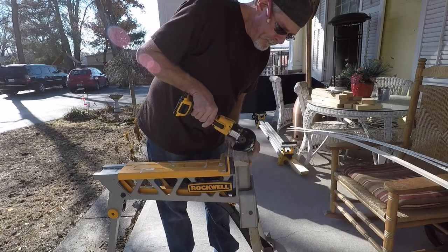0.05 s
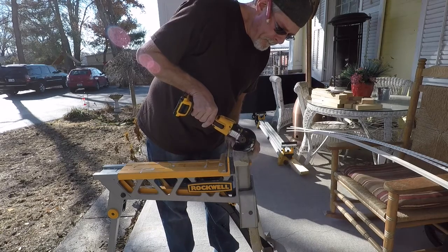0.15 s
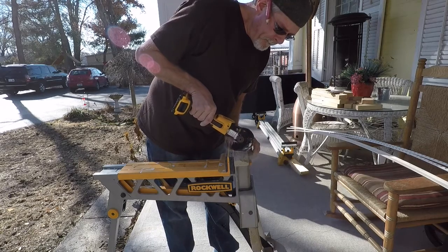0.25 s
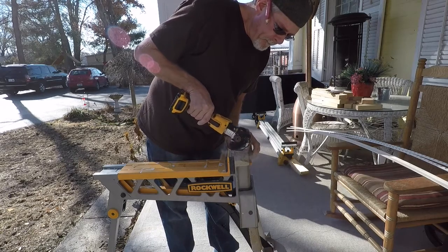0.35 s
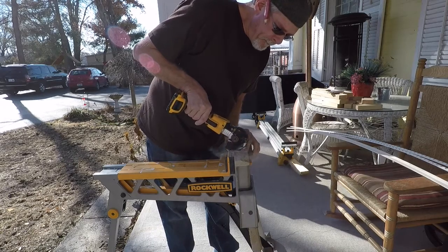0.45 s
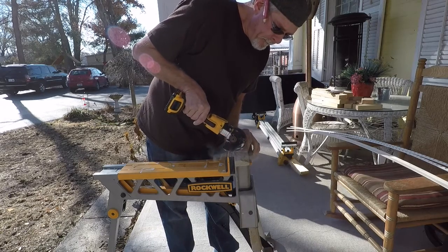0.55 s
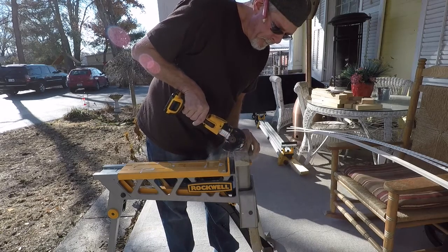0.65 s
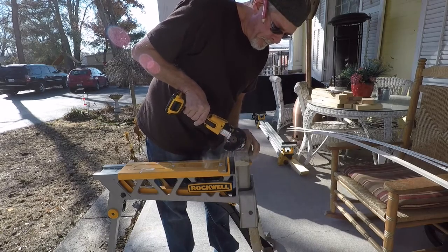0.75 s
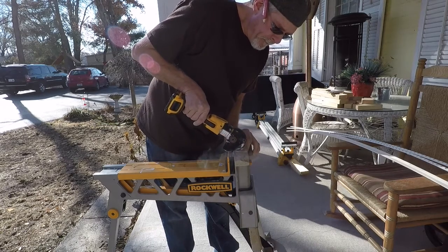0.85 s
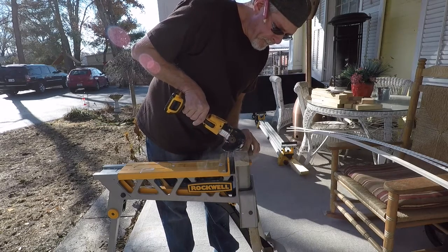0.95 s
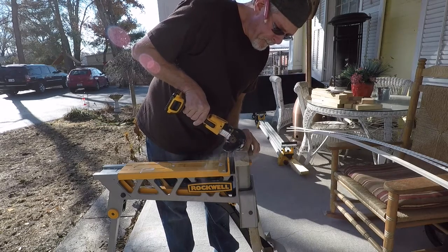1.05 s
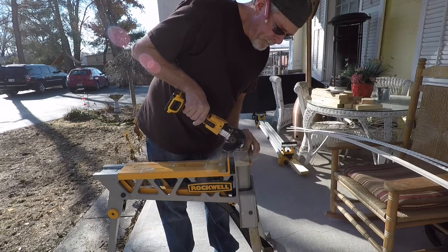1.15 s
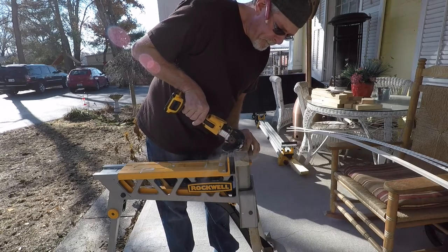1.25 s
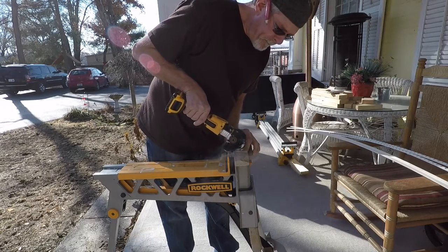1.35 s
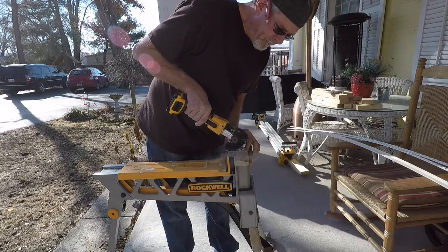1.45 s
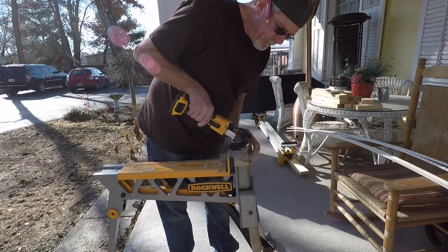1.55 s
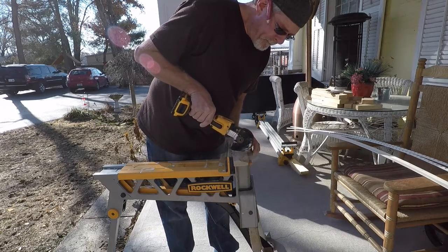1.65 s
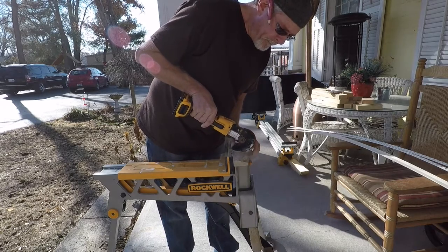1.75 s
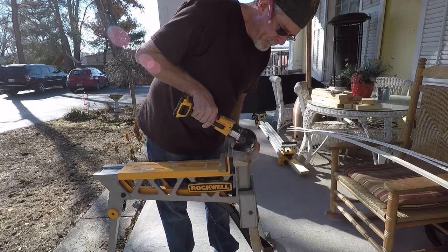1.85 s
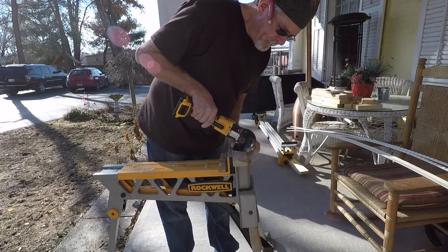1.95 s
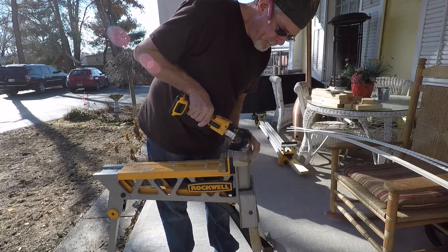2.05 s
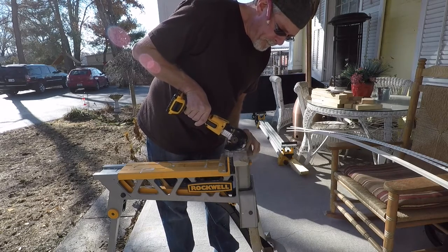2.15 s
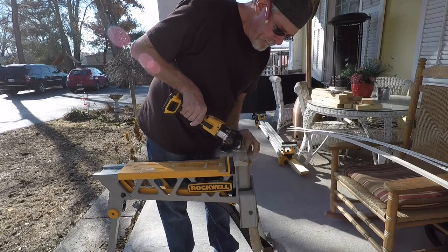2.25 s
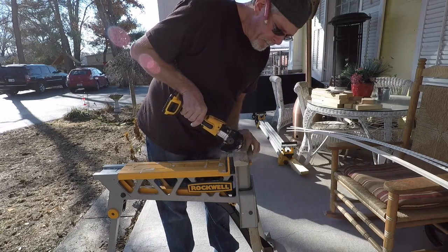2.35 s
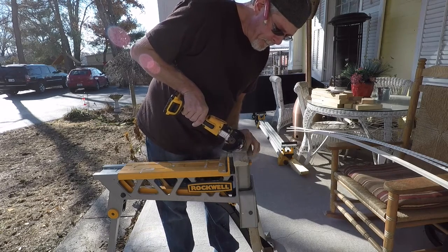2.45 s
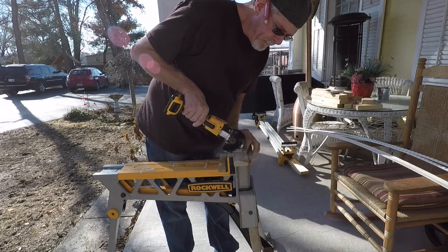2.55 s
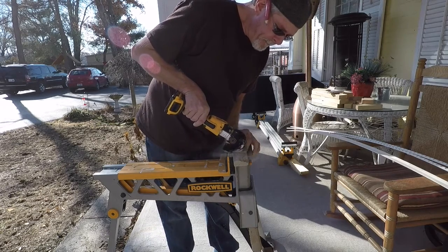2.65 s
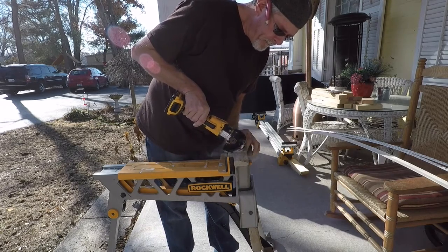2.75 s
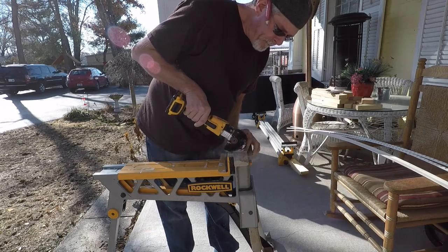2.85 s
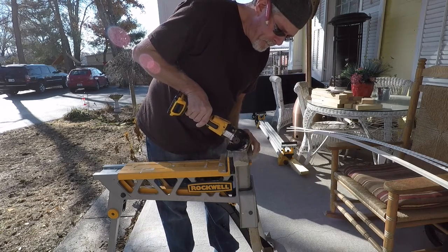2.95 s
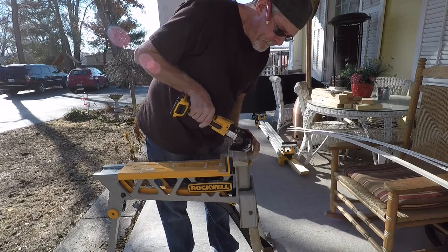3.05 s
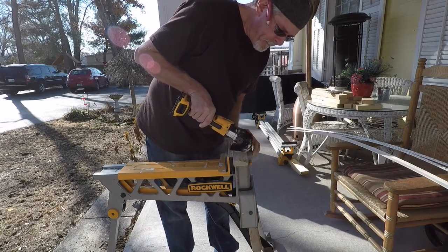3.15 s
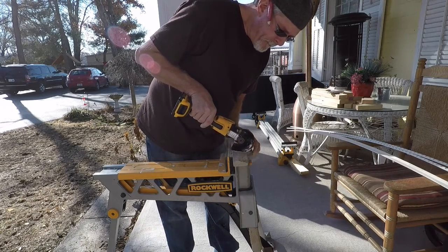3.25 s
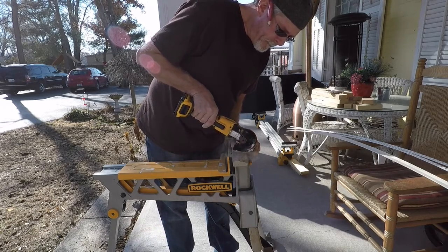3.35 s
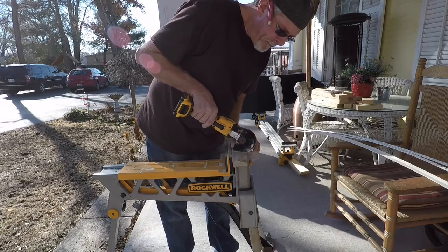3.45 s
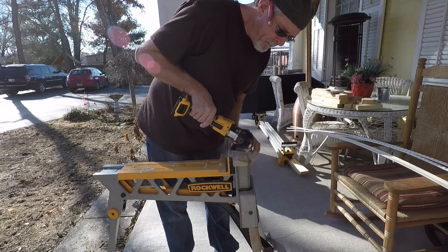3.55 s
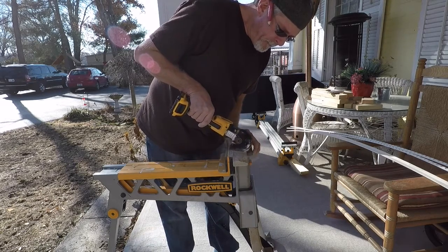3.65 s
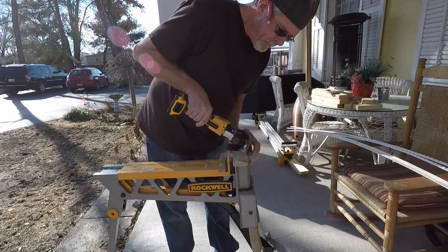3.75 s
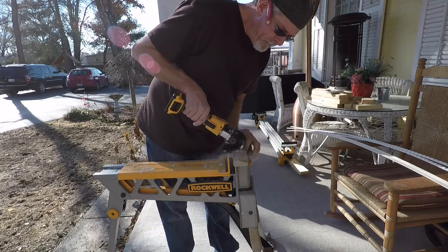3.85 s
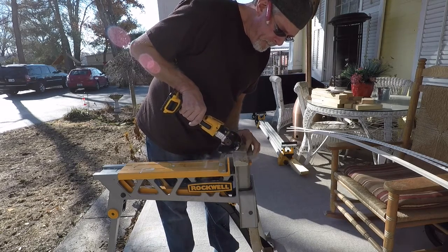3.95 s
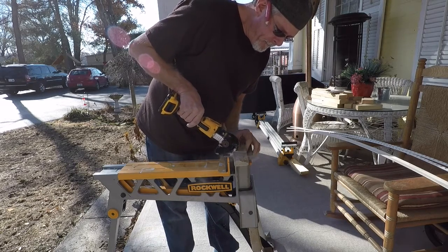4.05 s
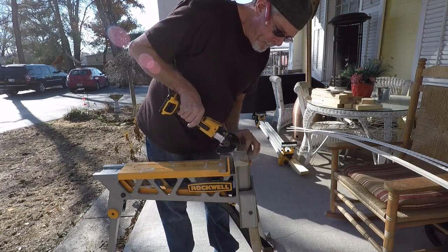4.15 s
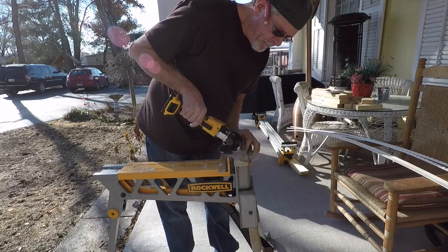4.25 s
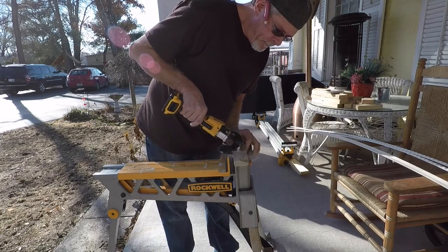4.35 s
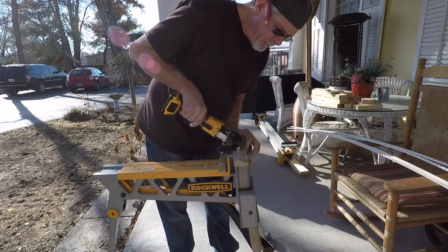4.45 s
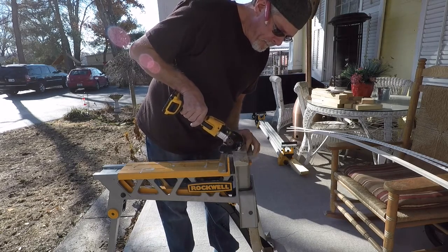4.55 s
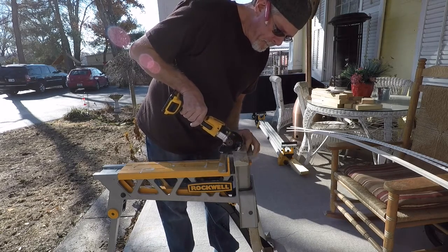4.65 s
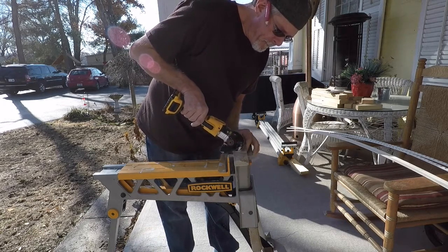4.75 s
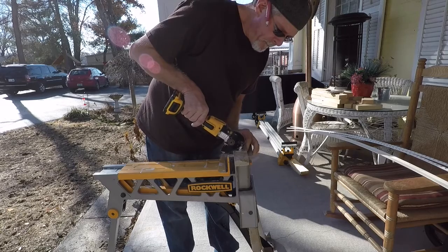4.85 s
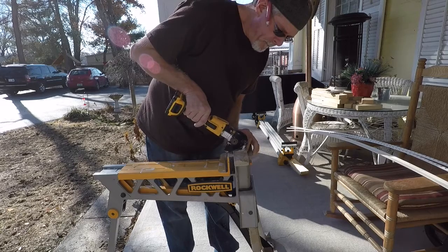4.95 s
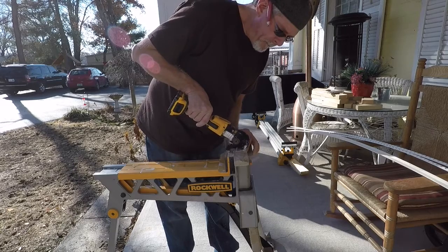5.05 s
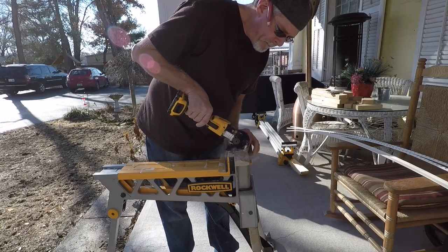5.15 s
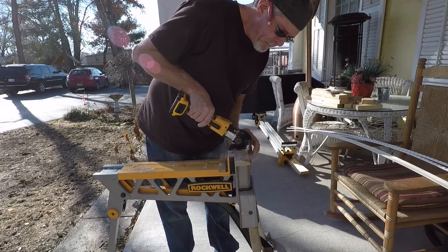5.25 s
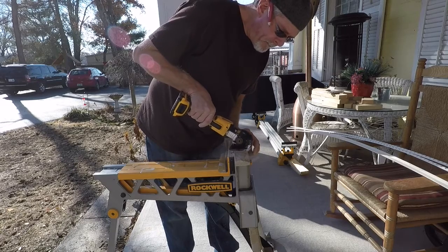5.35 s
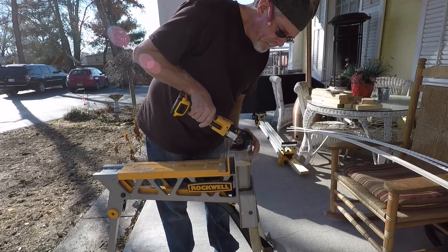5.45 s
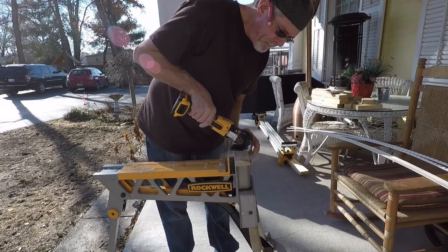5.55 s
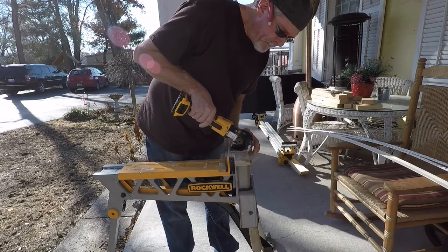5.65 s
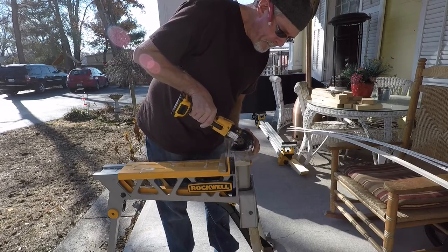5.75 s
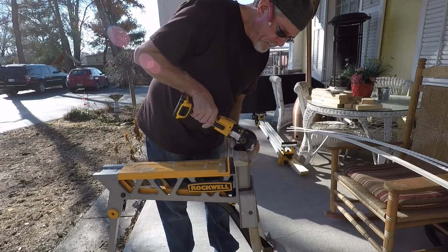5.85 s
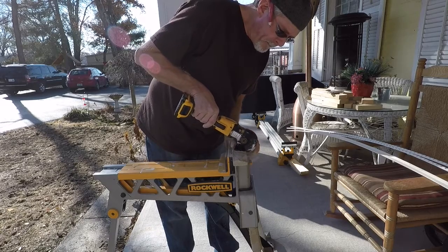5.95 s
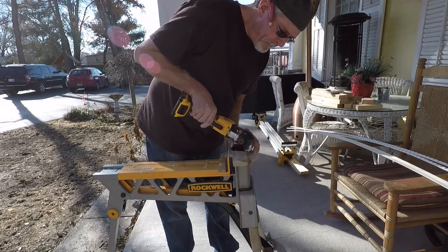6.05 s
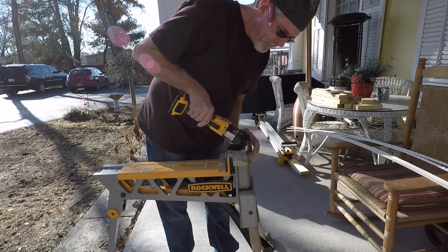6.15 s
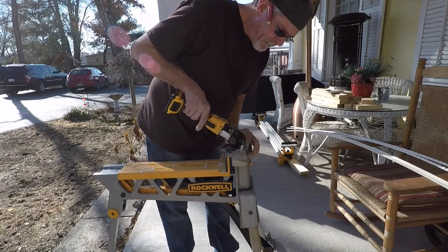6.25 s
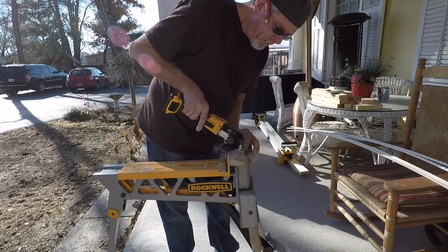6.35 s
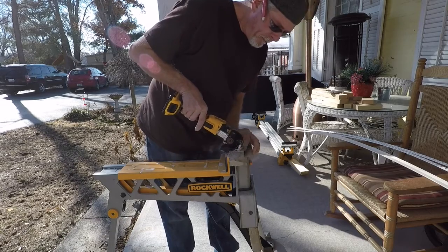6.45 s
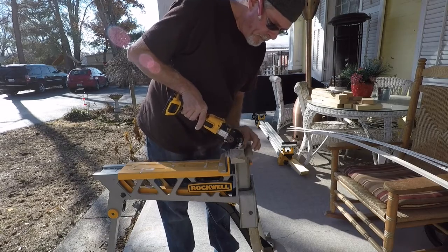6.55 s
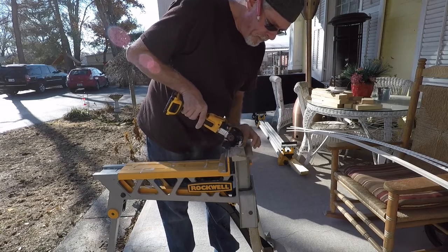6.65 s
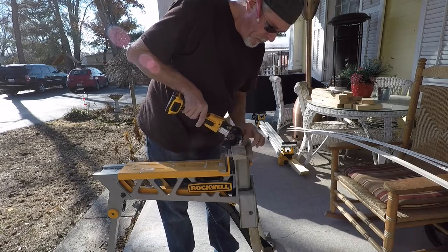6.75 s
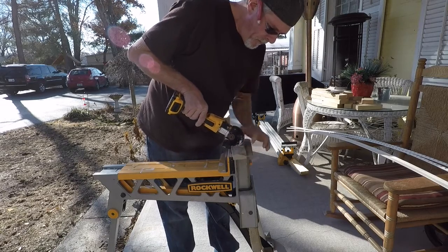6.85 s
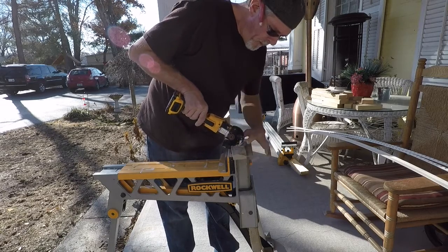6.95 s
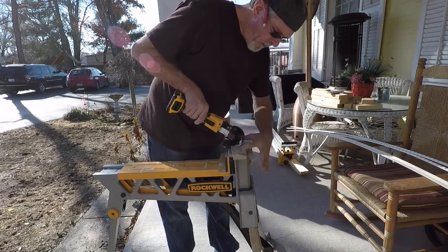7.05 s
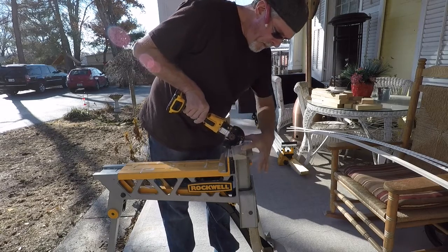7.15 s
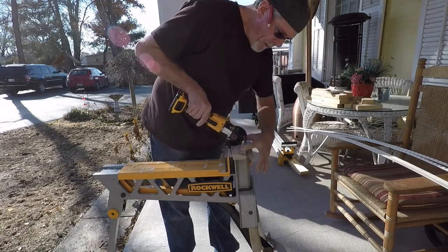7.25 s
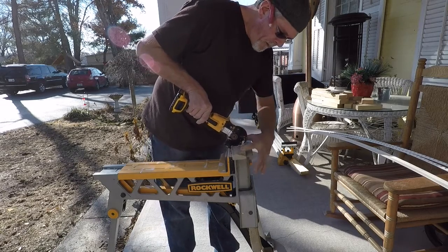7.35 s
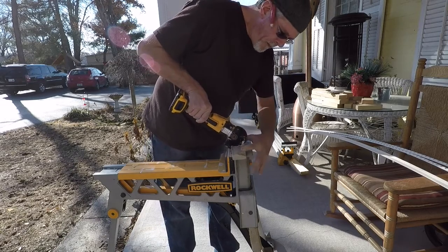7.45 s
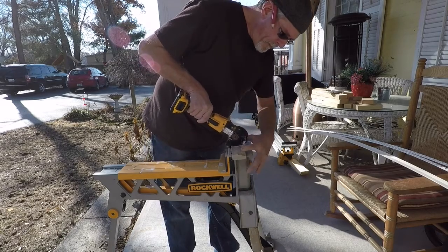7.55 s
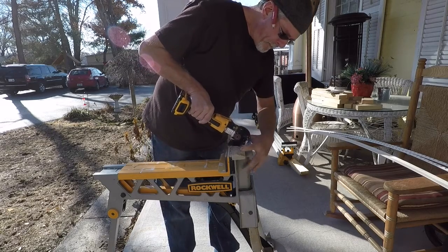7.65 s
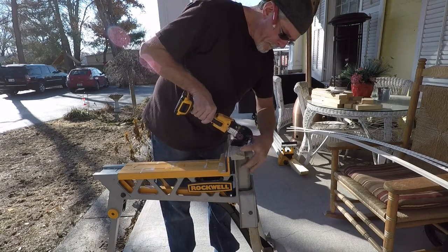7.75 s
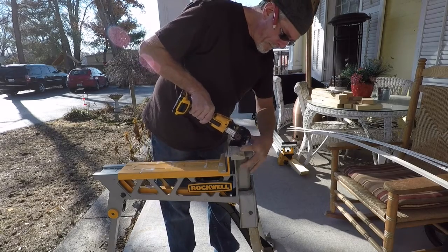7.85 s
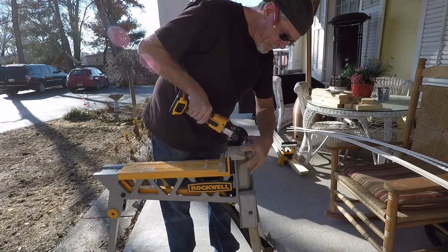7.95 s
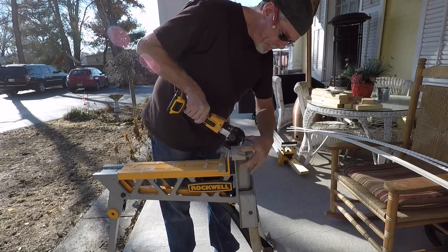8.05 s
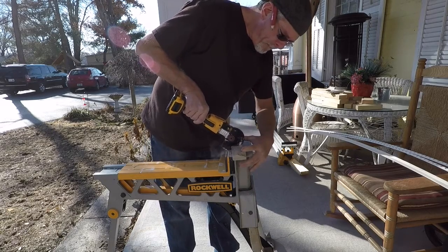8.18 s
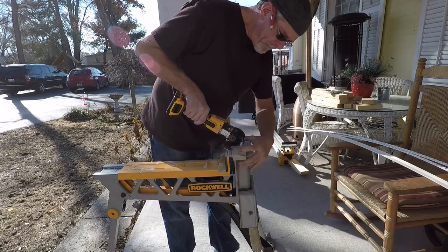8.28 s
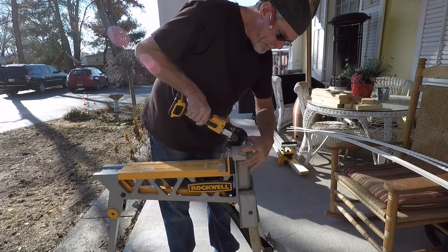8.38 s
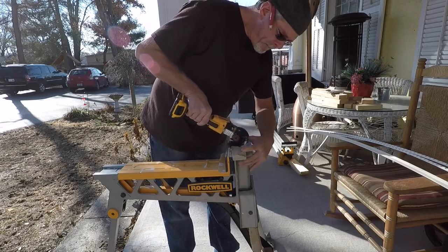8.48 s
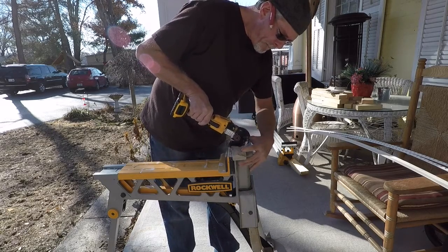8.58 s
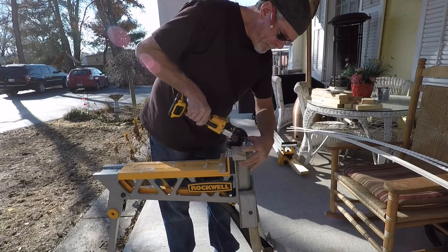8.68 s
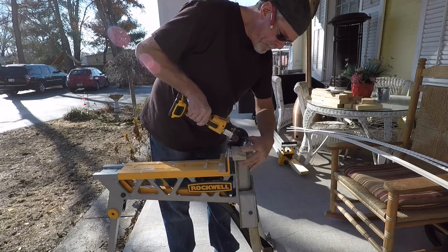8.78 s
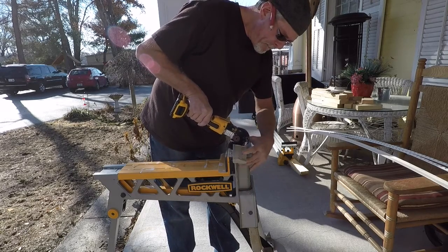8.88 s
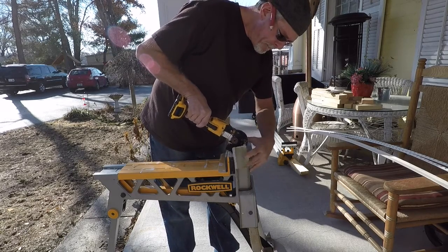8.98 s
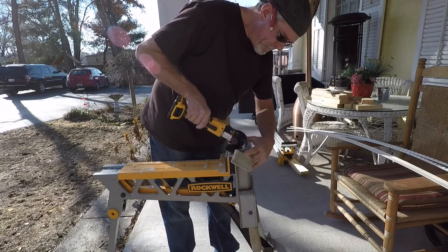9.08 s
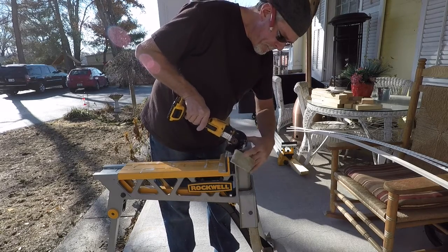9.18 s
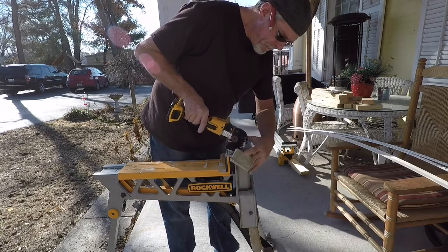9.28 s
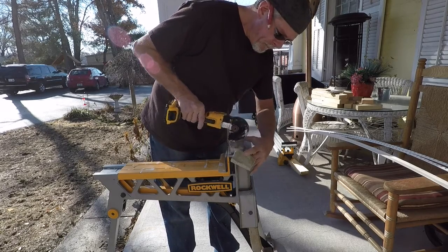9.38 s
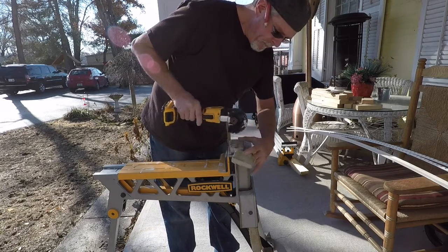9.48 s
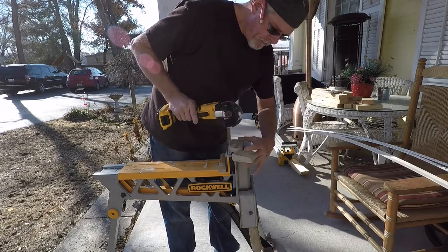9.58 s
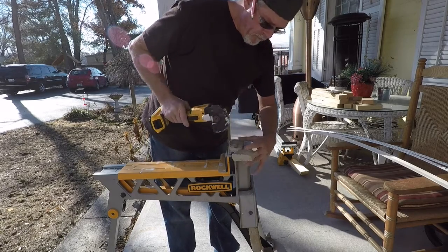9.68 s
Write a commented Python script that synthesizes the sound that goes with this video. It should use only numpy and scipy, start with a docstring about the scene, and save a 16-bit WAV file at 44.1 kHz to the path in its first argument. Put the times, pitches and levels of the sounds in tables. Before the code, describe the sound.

An oscillating power tool buzzes harshly through a clamped slab in one long cut, pauses, blips briefly, then cuts again and stops on a quiet porch.

```python
"""Porch: an oscillating tool grinds into a clamped slab: a long cut, a blip of the trigger, a shorter cut.
Blows in the kerf are a slowly changing pattern over six swings; grit is noise pulsed by the strokes.
Both are filtered by body and blade; sine tones follow multiples of the swing. Clacks, soft scuffs, bench
ring and a noise-tap porch tail follow; filtered noise makes light wind and street hum at one microphone."""
import sys
import numpy as np
from scipy import signal
from scipy.fft import rfft, irfft, next_fast_len
from scipy.io import wavfile
from scipy.ndimage import uniform_filter1d, map_coordinates

SR = 44100
rng = np.random.default_rng(int(sys.argv[2]) if len(sys.argv) > 2 else 0)


def dump_mix(stems):
    """Bounce the given channels to the path in sys.argv[1] as a 16-bit WAV at rate SR."""
    frames = np.atleast_2d(stems).T  # one column per channel
    limited = np.clip(frames, -1, 1)  # hard clip at full scale
    pcm = np.round(limited * 32767).astype(np.int16)
    wavfile.write(sys.argv[1], SR, pcm)


N = 428642


# spells when the blade is eased off the slab: (start [s], end [s])
EASED_SPELLS = [(3.83, 4.88), (5.94, 6.5), (8.86, 9.6)]
EASE_S = .08
# level against speed: (share of full speed, rattle held [dB], rattle coasting [dB], tones [dB])
LEVEL_BY_SPIN = [(.35, -40, -52, -60), (.45, -28, -36, -50), (.6, -7, -22, -38), (.75, -1, -5, -27),
                 (.9, 3, 1, -11), (.97, 0, 0, 0)]
# grit against rattle, before the slow-speed boost and trim: (time [s], level [dB])
GRIT_LEVEL = [(.3, -1), (.45, -5), (1.45, -4), (1.75, -2), (1.9, 4), (2.05, -5), (2.95, -4), (3.4, 3),
              (3.85, -4), (4, -12), (4.2, -8), (4.82, -8), (4.95, -1), (5.75, -1), (5.9, 2), (6, -8),
              (6.3, -8), (7.1, 2), (7.45, 0), (7.55, -6), (7.7, -8), (8.55, -6), (8.8, -7), (8.87, 3),
              (8.97, -7)]
SLOW_GRIT_DB, GRIT_MAX_DB = 60, 8  # grit gained per share of speed lost
RATTLE_DB, RATTLE_DB_PER_GRIT_DB = -11.5, .34  # a rougher cut is louder
TREBLE_DB, TREBLE_EASED_DB = -22.8, -21.5
SLOW_DULL_DB = -16  # treble lost per share of speed lost
CLATTER_DB, CLATTER_SLOPE = -50, 1.7


def tool():
    """Stroke-driven rattle and grit excite the body; multiples of the swing sound as tones."""
    t = np.arange(N) / SR
    share = spin(t)
    eased = sum(within(t, *spell, EASE_S) for spell in EASED_SPELLS)
    held = sum(within(t, on, off, .01) for on, off, _ in TRIGGER)
    grit_db = curve(GRIT_LEVEL, t)[0]
    grit_gain = gain_of(np.minimum(grit_db + SLOW_GRIT_DB * (1 - share), GRIT_MAX_DB))
    turns = swing(t, share, grit_gain)
    blow = gain_of(1.5 * rng.standard_normal(4000))[turns.astype(int)]  # each swing bites differently
    raw_grit = evened(rng.standard_normal(N) * strokes(turns) * blow)

    drive = rattle(turns) * blow ** .5 + gain_of(-1.) * grit_gain * fine_grit(raw_grit)
    drive /= np.sqrt(uniform_filter1d(drive ** 2, 3000))
    body = evened(colour(drive, blade_gain))
    treble = colour(body, band(6000, 20000))
    rest_gain = gain_of(RATTLE_DB + RATTLE_DB_PER_GRIT_DB * grit_db)
    treble_db = TREBLE_DB + (TREBLE_EASED_DB - TREBLE_DB) * eased + SLOW_DULL_DB * (1 - share)
    mix = rest_gain * (body - treble) + gain_of(treble_db) * evened(treble)
    mix += gain_of(CLATTER_DB) * clatter(raw_grit) * grit_gain ** CLATTER_SLOPE

    held_db, coast_db, tones_db = curve(LEVEL_BY_SPIN, share)
    out = gain_of(coast_db + (held_db - coast_db) * held) * mix
    out += tones(t, turns, eased, tones_db, grit_gain)
    return out * uniform_filter1d((share > .25) * 1., 100)


# trigger: (pulled [s], released [s], coast-down time [s])
TRIGGER = [(-1, 6.206, .165), (7.082, 7.207, .22), (7.343, 9.102, .36)]
KICK, SPIN_UP_S = .4, .05  # KICK: share of full speed


def spin(t):
    """Share of full speed: a kick and run-up on the pull, a linear coast on release."""
    runs = []
    for on, off, coast_s in TRIGGER:
        run_up = 1 - (1 - KICK) * np.exp(-(np.maximum(t - on, 0) / SPIN_UP_S) ** 1.5)
        runs.append((t > on) * (run_up - np.maximum(t - off, 0) / coast_s))
    return np.max(runs, 0).clip(0, 1)


# full-throttle speed under load, one list per cut: (time [s], rate [swings/s])
CUT_SPEEDS = [
    [(0.0, 287.5), (0.01, 288.6), (0.33, 290.9), (0.36, 293.7), (0.62, 288.8), (0.9, 292.0), (1.0, 288.8),
     (1.16, 293.0), (1.28, 287.5), (1.4, 288.8), (1.64, 283.4), (1.85, 284.5), (1.88, 281.9), (1.91, 288.1),
     (2.17, 290.1), (2.88, 287.5), (3.23, 279.3), (3.37, 288.2), (3.42, 282.3), (3.45, 286.9),
     (3.64, 285.6), (3.95, 296.9), (4.25, 294.4), (4.32, 297.4), (4.78, 297.0), (4.92, 287.3),
     (5.11, 291.6), (5.28, 285.2), (5.72, 284.8), (5.82, 277.1), (5.87, 283.0), (5.9, 280.3), (5.97, 295.2),
     (6.2, 299.9)],
    [(7.46, 287.9), (7.522, 289.3), (7.674, 286.2), (7.82, 294.6), (7.97, 287.8), (8.02, 291.0),
     (8.222, 292.0), (8.268, 290.0), (8.39, 292.5), (8.5, 288.1), (8.588, 292.6), (8.798, 291.8),
     (8.834, 289.9), (8.884, 300.0), (8.93, 303.9), (9.1, 302.9)],
]
# full-throttle speed in the blip: (time [s], rate [swings/s])
BLIP_SPEED = (7.15, 290)
WOBBLE_HZ, WOBBLE_S = 1.2, .03


def swing(t, share, grit_gain):
    """Blade position in swings: integrated speed, wobbling and shaking more in a rough cut."""
    full_hz = curve(CUT_SPEEDS[0] + [BLIP_SPEED] + CUT_SPEEDS[1], t)[0]
    wobble_hz = WOBBLE_HZ * grit_gain.clip(0, 1.5) * waver(t, WOBBLE_S)
    turns = np.cumsum((full_hz + wobble_hz) * np.maximum(share, KICK)) / SR
    turns += .003 * smooth_noise(N, 500)
    turns += .006 * grit_gain ** 2 / (1 + .3 * grit_gain) * smooth_noise(N, 200)
    return turns


def rattle(turns, spread=.5, wander=.8, slide=.8):
    """A six-swing blow pattern, 100 versions a second, read out at the blade position."""
    frames_hz, size = 100, 4096
    frames = N * frames_hz // SR + 3
    second_db, sixth_db = chatter(np.arange(frames) / frames_hz)
    k = np.arange(340)  # sixths of the swing rate
    partial_db = np.where(k % 3 == 0, second_db[:, None], sixth_db[:, None])
    share = np.where(k % 6 == 0, 1, gain_of(partial_db))
    share[:, (6 * multiples()).astype(int)] = 0  # played as tones
    height = share * gain_of(3.5 * smooth_noise((frames, len(k)), 6))
    # related phases in neighbouring multiples bunch each swing into a burst
    phase = np.cumsum(spread * rng.standard_normal(len(k)))
    phase = phase + wander * smooth_noise((frames, len(k)), 12)
    phase += 2 * np.pi * rng.random(len(k)) * (k % 3 > 0)  # slow pattern spread over six swings
    # whole bands shift in time
    phase += slide * evened(uniform_filter1d(smooth_noise((frames, len(k)), 8), 40, 1))
    pattern = irfft(height * np.exp(1j * phase), size)
    at = [np.arange(N) * frames_hz / SR, turns % 6 / 6 * size]
    return map_coordinates(pattern, at, order=1, mode="grid-wrap") / np.sqrt(np.mean(pattern[-1] ** 2))


# blows repeating over several swings:
# (start [s], end [s], every-second-swing level [dB], every-sixth-swing level [dB])
CHATTER_SPELLS = [(-1, .35, -7, -19), (.42, 1.37, -4.5, -11), (1.6, 1.95, -7, -20), (2.05, 2.9, -5, -15),
                  (3.05, 3.75, -6, -19), (4.12, 4.85, -12, -30), (4.92, 5.8, -4.5, -18)]
CALM_DB, CHATTER_EDGE_S = (-16, -29), .08  # between spells


def chatter(t):
    """Levels in dB of the every-second- and every-sixth-swing patterns."""
    calm_db = np.array(CALM_DB)[:, None]
    return calm_db + sum(within(t, start, end, CHATTER_EDGE_S) * (np.array(db)[:, None] - calm_db)
                         for start, end, *db in CHATTER_SPELLS)


def strokes(turns, sharp=1.66, back=.51):
    """The blade bites hardest once a swing and again, weaker, on the way back."""
    return np.exp(-sharp * (turns % 1)) + back * np.exp(-2 * sharp * ((turns + .5) % 1))


def fine_grit(grit):
    """Fine grains carry little bass and extra treble."""
    return colour(grit, lambda hz: band(620, 30000)(hz) * hz / np.hypot(hz, 1400) * np.hypot(1, hz / 8000))


def clatter(grit):
    """The slab knocks in its clamp: the low-mid band of the grit."""
    return evened(colour(grit, band(520, 950)))


# tool, slab and bench colour: (frequency [Hz], level [dB/Hz])
BODY_SPECTRUM = [(150, -42), (400, -13.5), (900, -7), (1600, 2.5), (2600, 2), (4000, -0.5), (5100, 0.5),
                 (6000, -3), (7400, 7.5), (9000, -7), (10300, -7), (12000, -5), (13500, -4.5),
                 (15000, -9.5)]
# blade resonances over the body colour: (frequency [Hz], width [Hz], level [dB])
BLADE_PEAKS = [(3436, 380, -1), (4717, 570, 4.5), (7185, 100, -29.5), (8913, 1200, 8.5), (11880, 1200, 1)]


def blade_gain(hz):
    """Broad body colour with the blade's resonances on top."""
    peaks = sum(gain_of(db) / (1 + (2 * (hz - f) / width) ** 2) for f, width, db in BLADE_PEAKS)
    return gain_of(read(BODY_SPECTRUM, hz)) * (1 + peaks)


# tones before speed, spell and chatter offsets:
# (multiple of swing rate, pressed level [dB], eased level [dB], wavering share)
TONE_LEVELS = [(.5, -55.5, -50, .2), (1, -42.5, -47, .1), (1.5, -51, -46, .3), (2, -44.5, -40, .45),
               (2.5, -47, -44, .3), (3, -40, -44, .35), (4, -39, -38, .4), (5, -35, -32, .4),
               (6, -30.5, -29, .3), (7, -32, -29, .4), (8, -31, -35, .35), (9, -36, -33, .4),
               (11, -35, -32, .4), (12, -25, -31, .25)]
# spells when one tone sings out or sinks: (start [s], end [s], multiple, level change [dB])
SINGING_SPELLS = [(.45, 1.4, 5, 6), (1.45, 2, 3, 5), (5.7, 6.3, 3, 4), (2.1, 2.9, 2, 3), (2.1, 2.95, 8, 3),
                  (3.05, 3.65, 4, 6), (3, 3.6, 3, 6), (4.25, 4.85, 11, 4), (4.3, 4.87, 2, 3),
                  (4.2, 4.87, 6, 3), (5.25, 5.75, 4, 6), (5.95, 6.3, 1, 4), (5.95, 6.3, 4, 6),
                  (7.4, 8.86, 1, 2.5), (7.18, 7.26, 8, 8), (7.15, 7.26, 7, 6), (7.15, 7.26, 6, 4),
                  (7.4, 7.5, 6, 3), (8, 8.3, 5, 6), (8.93, 9.12, 11, 10), (8.95, 9.15, 9, 4),
                  (4.3, 4.87, 9, 4), (4.5, 4.87, 7, 3), (7, 7.44, 12, -10), (5.3, 5.94, 12, -3),
                  (8.95, 9.15, 6, -12), (8.95, 9.15, 7, -10), (9.02, 9.12, 8, 6), (8.95, 9.15, 5, -6),
                  (7.4, 8, 2, -3), (8, 8.4, 2, 3), (8, 8.5, 3, 2), (5.95, 6.3, 5, -4), (7.15, 7.26, 5, 4)]
HALF_SLOPE, WAVER_S = 1.8, .06


def tones(t, turns, eased, tones_db, grit_gain):
    """Sines locked to the swing; half multiples follow the chatter, upper ones break up with grit."""
    slow_t, eased, tones_db, grit_gain = t[::40], eased[::40], tones_db[::40], grit_gain[::40]
    half_db = HALF_SLOPE * (chatter(slow_t)[0] + 5)
    out = np.zeros(N)
    for order, (_, pressed_db, eased_db, depth) in zip(multiples(), TONE_LEVELS):
        db = pressed_db + (eased_db - pressed_db) * eased + tones_db + (order % 1 > 0) * half_db
        db += sum(change_db * within(slow_t, start, end, EASE_S)
                  for start, end, k, change_db in SINGING_SPELLS if round(k) == order)
        flutter = gain_of(2. * grit_gain.clip(0, 1) * min(order / 4, 1) * waver(slow_t, .013))
        flutter *= (1 + depth * waver(slow_t, WAVER_S)) / np.hypot(1, depth)
        level = np.interp(t, slow_t, gain_of(db) * flutter)
        out += np.sqrt(2) * level * np.sin(2 * np.pi * (order * turns + rng.random()))
    return out


def multiples():
    """The tones' multiples of the swing rate, in half steps."""
    return np.round(2 * np.array(TONE_LEVELS)[:, 0]) / 2


# clacks as the blade breaks loose, before filtering: (time after pull [s], level [dB])
FIRST_BLOWS = [(.002, -36), (.015, -23)]
BLOW_T60_S = .03


def first_blows():
    """Two decaying noise clacks after each pull of the trigger within the scene."""
    out, t = np.zeros(N), np.arange(2000) / SR
    for on, *_ in TRIGGER[1:]:
        for after, db in FIRST_BLOWS:
            at = round((on + after) * SR)
            out[at:at + len(t)] += gain_of(db - 60 * t / BLOW_T60_S) * rng.standard_normal(len(t))
    return colour(out, band(1000, 9000))


# soft scuffs of a brief rustle, before trim and filtering: (time [s], level [dB], t60 [s])
SCUFFS = [(6.559, -30, 0.09), (6.586, -29, 0.15), (6.609, -33, 0.09), (6.669, -29, 0.11),
          (6.709, -35, 0.09)]
SCUFF_TRIM_DB, SCUFF_RISE_S = -10.5, .0055


def scuffs():
    """Soft scuffs of a brief rustle: noise bursts with a slow attack, dulled above 3 kHz."""
    out, t = np.zeros(N), np.arange(4000) / SR
    for s, db, t60 in SCUFFS:
        at = round(s * SR)
        envelope = gain_of(db + SCUFF_TRIM_DB - 60 * t / max(t60, .01)) * np.tanh(t / SCUFF_RISE_S)
        out[at:at + len(t)] += envelope * rng.standard_normal(len(t))
    return colour(out, lambda hz: band(400, 14000)(hz) / np.sqrt(1 + (hz / 3000) ** 2))


# bench frame modes, before trim: (frequency [Hz], level [dB], t60 [s])
FRAME_MODES = [(1140, -42, .55), (2850, -44, .5), (7000, -49, .7)]
FRAME_TRIM_DB = -22


def frame(x):
    """The steel bench rings on after the tool stops: decaying sine modes."""
    t = np.arange(SR) / SR
    ring = sum(gain_of(db - 60 * t / t60) * np.sin(2 * np.pi * hz * t) for hz, db, t60 in FRAME_MODES)
    return signal.fftconvolve(x, ring)[:N] * gain_of(FRAME_TRIM_DB)


# porch decay: (frequency [Hz], t60 [s])
PORCH_DECAY = [(300, 1), (1500, .5), (5000, 0.48), (12000, 0.17)]


def porch(x):
    """Sparse reflections of random sign, each band dying at its own speed."""
    taps = np.zeros(SR)
    at = np.arange(300, SR - 20, 20) + rng.integers(0, 20, (SR - 301) // 20)
    taps[at] = rng.choice([-1., 1.], len(at))
    hz, t, z = signal.stft(taps, SR, nperseg=256)
    decay = gain_of(-60 * t / read(PORCH_DECAY, hz)[:, None])
    tail = signal.istft(z * decay, SR, nperseg=256)[1]
    return signal.fftconvolve(x, tail / np.linalg.norm(tail))[:N]


# street hum colour, relative: (frequency [Hz], level [dB/Hz])
STREET_SPECTRUM = [(76, -34), (130, -8.5), (155, -4.5), (179, -29.5), (218, -7), (358, -21), (420, -18),
                   (464, -16), (841, -16.5), (5230, -26), (9000, -30), (15000, -41)]
STREET_DB = -57
# wind between gusts, before slow random drift: (time [s], buffeting level [dB], rumble level [dB])
BREEZE = [(0, -51, -60), (4, -50, -59), (6.2, -50, -58), (7.4, -51, -64), (7.8, -48, -66), (9, -49, -65),
          (9.7, -52, -62)]
# gusts on the microphone: (time [s], length [s], buffeting level [dB], rumble level [dB])
GUSTS = [(.47, .2, -49, -60), (.92, .25, -42, -62), (1.35, .2, -46, -63), (1.8, .3, -44, -58),
         (2.75, .2, -50, -60), (2.98, .2, -43, -61), (3.46, .1, -36, -50), (3.58, .12, -38, -61),
         (3.88, .3, -42, -60), (6.11, .12, -35, -47), (7.05, .3, -46, -59)]


def outdoors():
    """Steady street-hum noise; wind on the microphone as low noise in two bands."""
    street_noise, buffet_noise, rumble_noise = rng.standard_normal((3, N))
    t = np.arange(N) / SR
    wind = gain_of(curve(BREEZE, t)) * gain_of(2.5 * smooth_noise((N, 2), 6000).T)
    for s, length_s, *db in GUSTS:
        wind += gain_of(db)[:, None] * np.exp(-((t - s) / (length_s / 2)) ** 2)
    street = evened(colour(street_noise, lambda hz: gain_of(read(STREET_SPECTRUM, hz))))
    buffet = evened(colour(buffet_noise, lambda hz: band(3, 60)(hz) / (1 + (hz / 6) ** 2)))
    rumble = evened(colour(rumble_noise, band(62, 136.5)))
    return gain_of(STREET_DB) * street + wind[0] * buffet + wind[1] * rumble


def gain_of(db):
    """Amplitude ratio of a level in dB."""
    return 10 ** (np.asarray(db) / 20)


def evened(x):
    """Scales to unit RMS."""
    return x / np.sqrt(np.mean(np.abs(x) ** 2) + 1e-20)


def read(points, hz):
    """Reads a frequency table on a log-frequency axis."""
    f, value = np.transpose(points)
    return np.interp(np.log(hz + 1), np.log(f + 1), value)


def curve(rows, x):
    """Interpolates every column of a table against its first."""
    first, *columns = np.transpose(rows)
    return [np.interp(x, first, c) for c in columns]


def colour(x, gain_at):
    """Filters by a gain given as a function of frequency."""
    size = next_fast_len(N)
    return irfft(rfft(x, size) * gain_at(np.fft.rfftfreq(size, 1 / SR)), size)[:N]


def band(lo_hz, hi_hz):
    """Gain of a steep band-pass."""
    return lambda hz: 1 / np.sqrt((1 + (lo_hz / (hz + 1e-3)) ** 8) * (1 + (hz / hi_hz) ** 8))


def smooth_noise(shape, span):
    """Unit-RMS noise that changes slowly along the first axis."""
    width = max(int(span), 1)
    once = uniform_filter1d(rng.standard_normal(shape), width, 0)
    return evened(uniform_filter1d(once, width, 0))


def within(t, start, end, edge_s):
    """1 inside a spell, 0 outside, with sloping edges."""
    return np.clip(np.minimum(t - start, end - t) / edge_s + .5, 0, 1)


def waver(t, span_s):
    """Slow noise, drawn 500 times a second."""
    steps = smooth_noise(N * 500 // SR + 2, span_s * 500)
    return np.interp(t * 500, np.arange(len(steps)), steps)


def scene():
    """Near sources, their bench ring and porch tail, and the outdoors, on two equal channels."""
    near = tool() + first_blows() + scuffs()
    mono = near + frame(near) + gain_of(-21) * porch(near) + outdoors()
    return np.array([mono, mono])


EDGE_HZ = 15250


def record(dry):
    """Peaks are rounded off, then a low-pass limits the band."""
    soft = np.tanh(dry)
    low_pass = signal.firwin(1023, EDGE_HZ, window=("kaiser", 9), fs=SR)
    return signal.oaconvolve(soft, low_pass[None], "same")


dry = scene()
out = record(dry)
dump_mix(out)
```